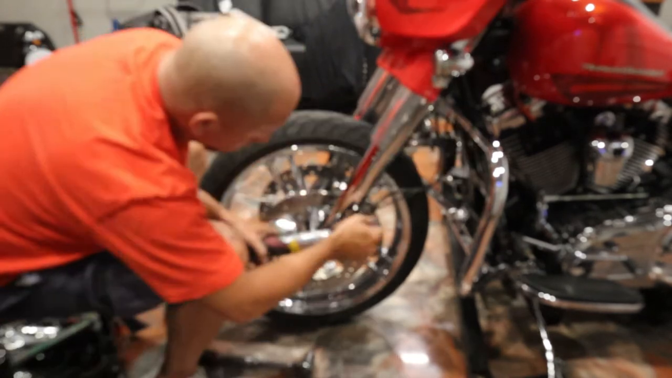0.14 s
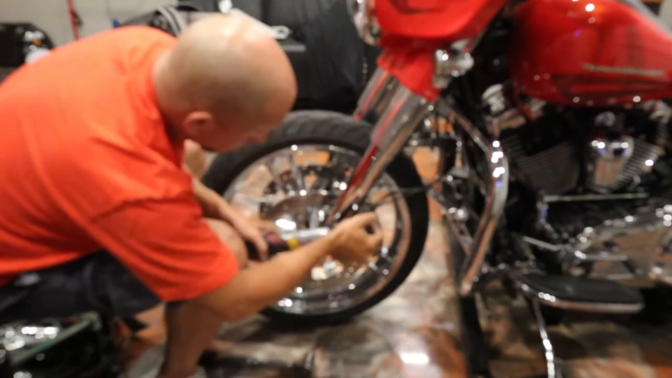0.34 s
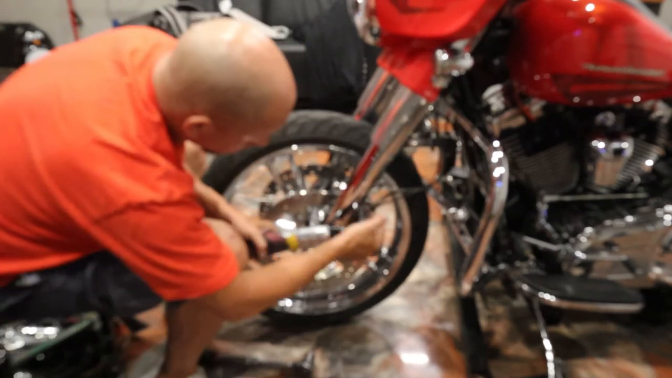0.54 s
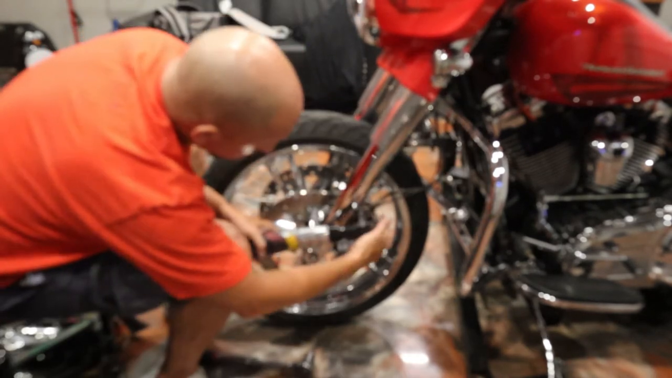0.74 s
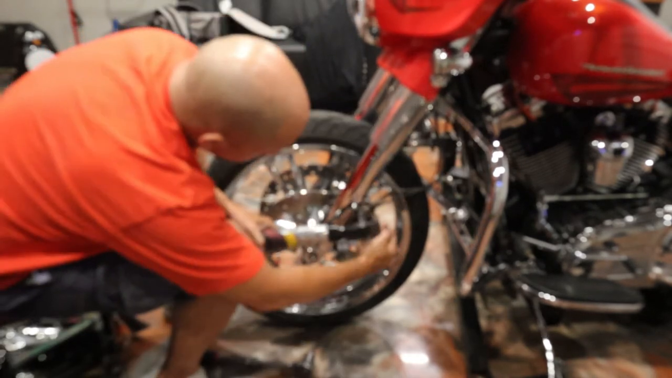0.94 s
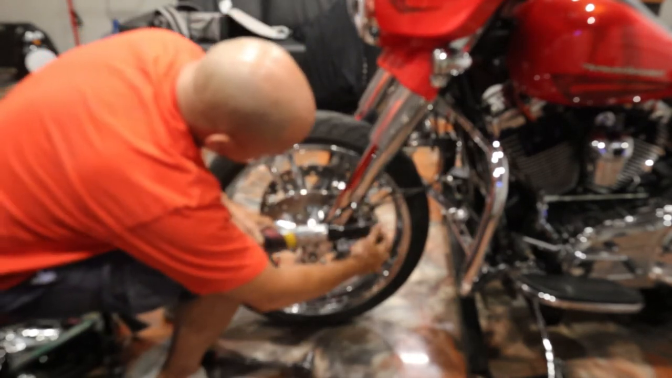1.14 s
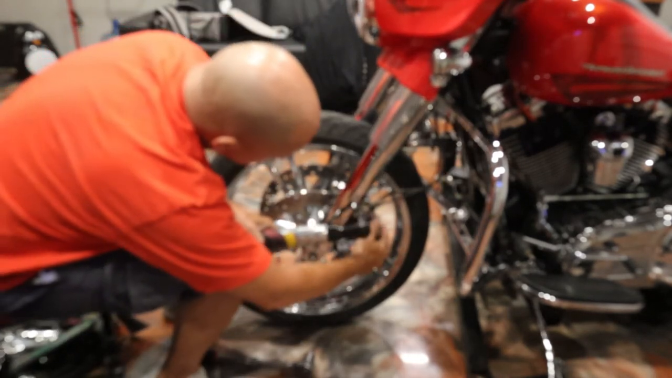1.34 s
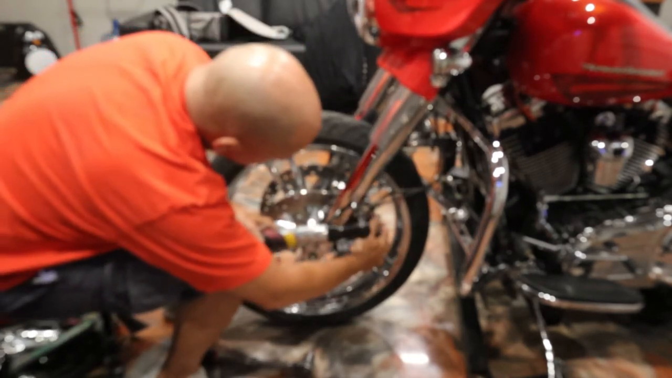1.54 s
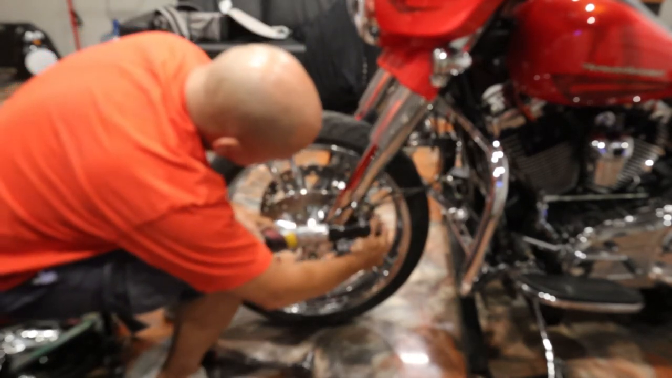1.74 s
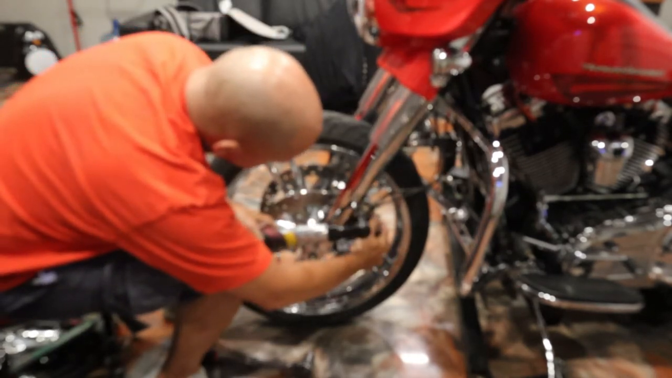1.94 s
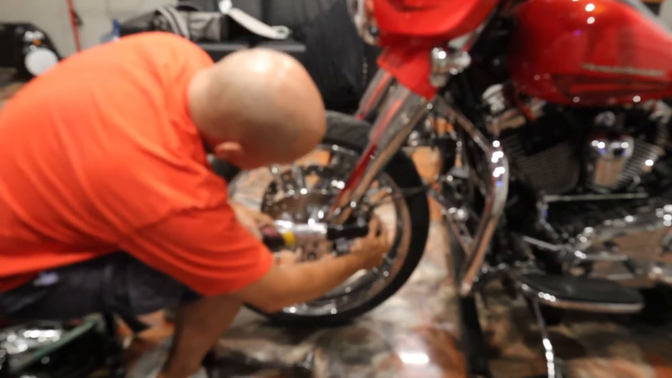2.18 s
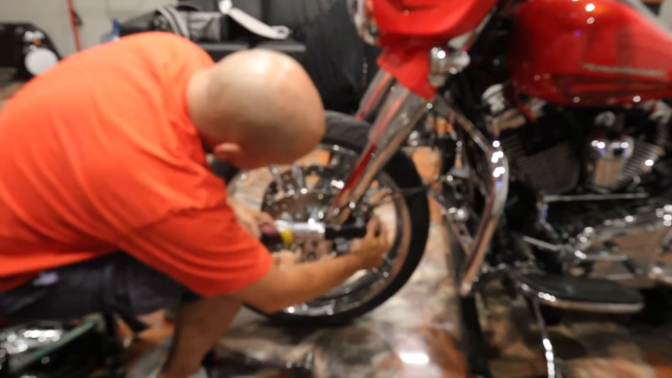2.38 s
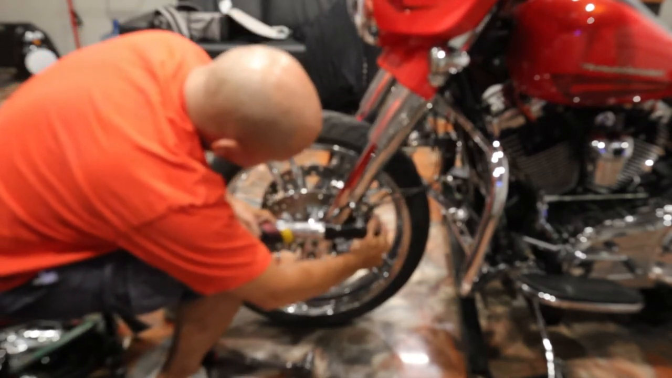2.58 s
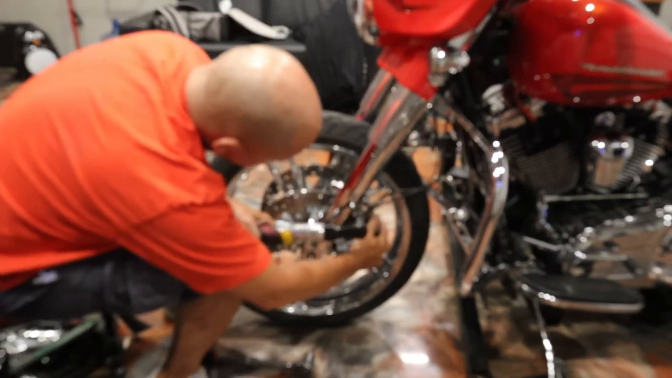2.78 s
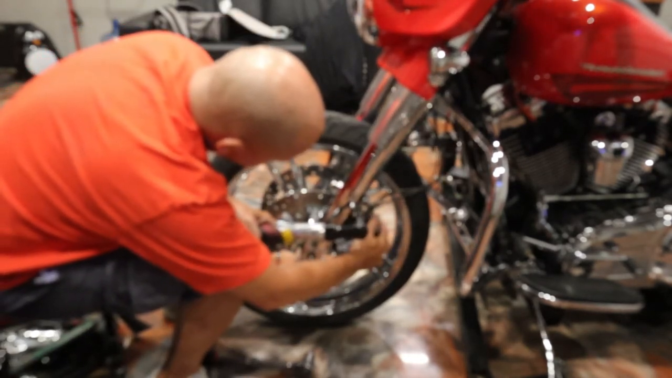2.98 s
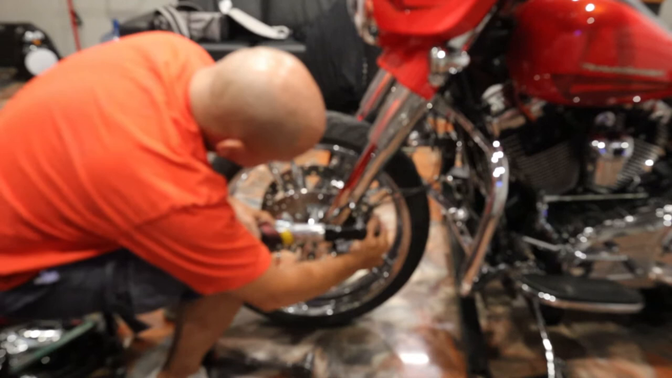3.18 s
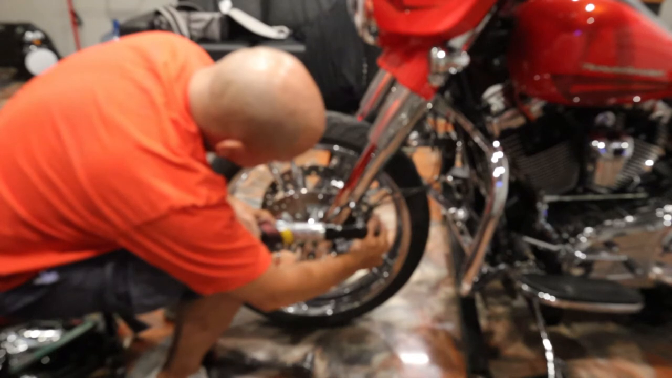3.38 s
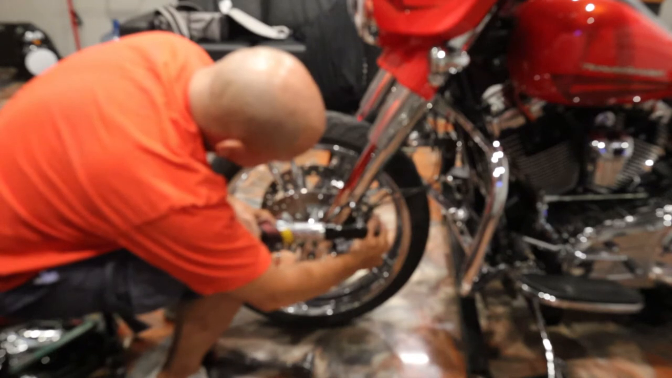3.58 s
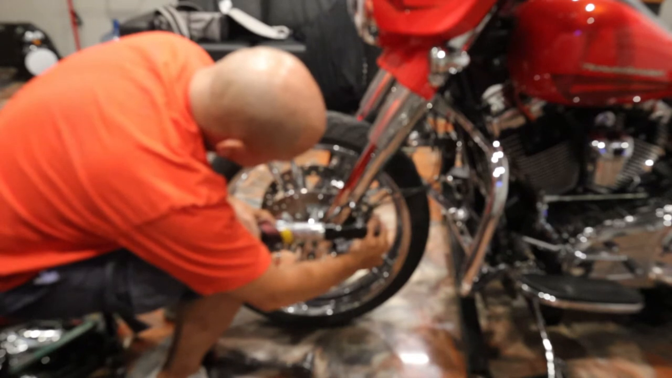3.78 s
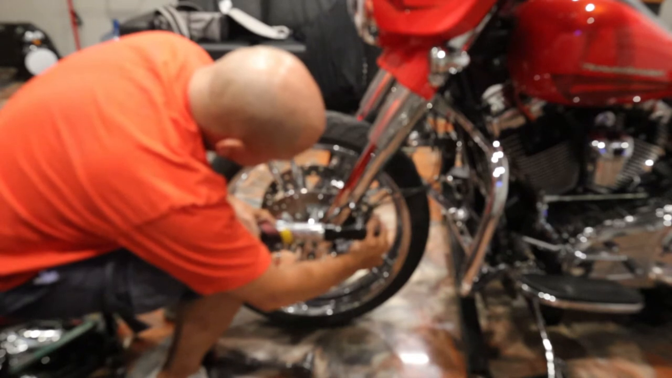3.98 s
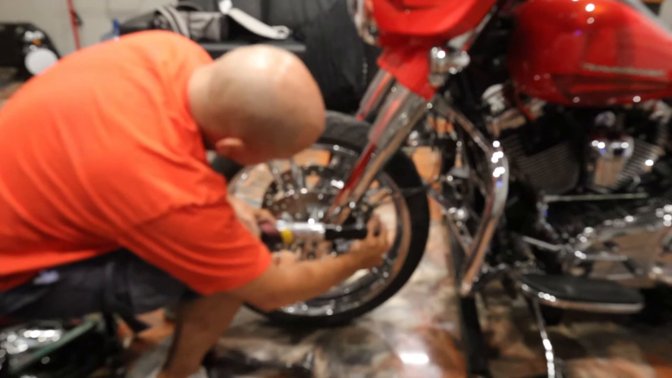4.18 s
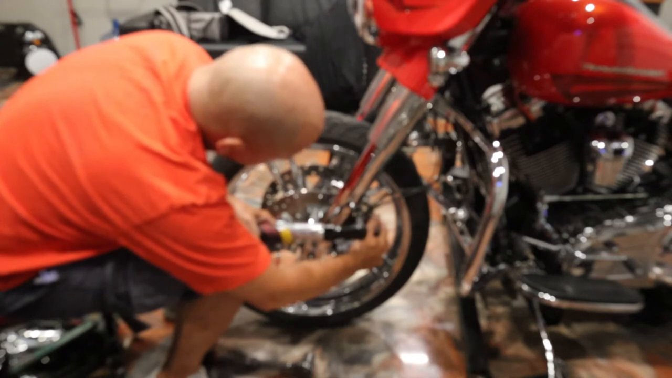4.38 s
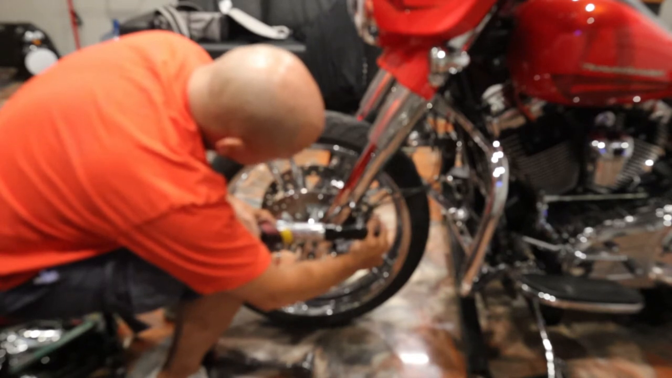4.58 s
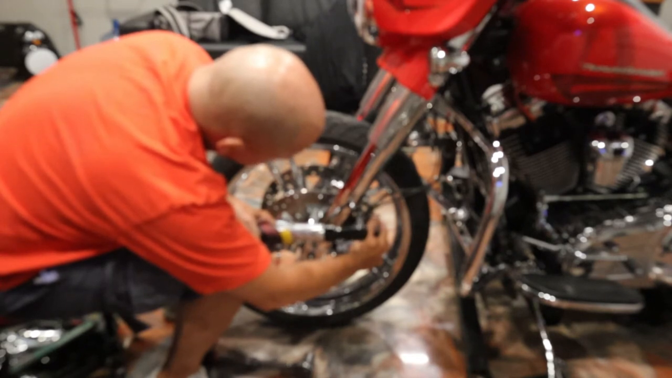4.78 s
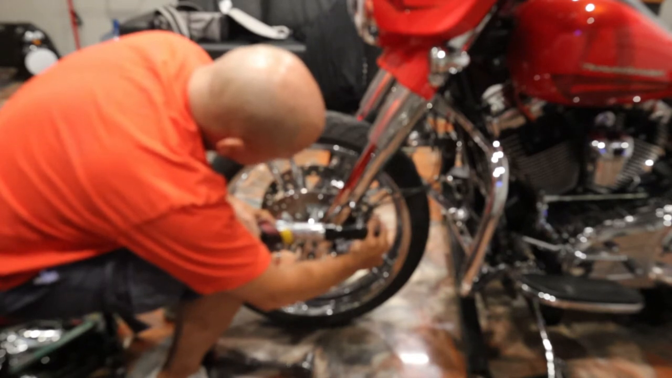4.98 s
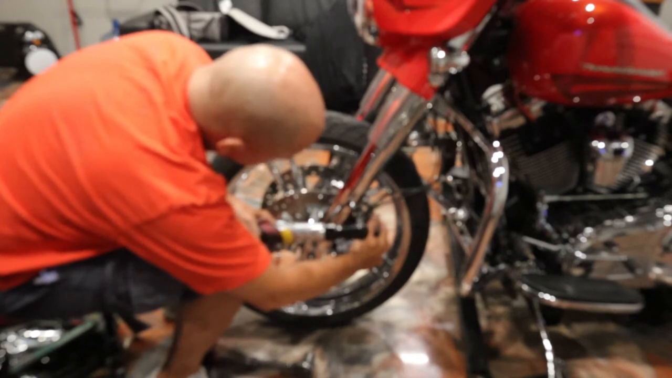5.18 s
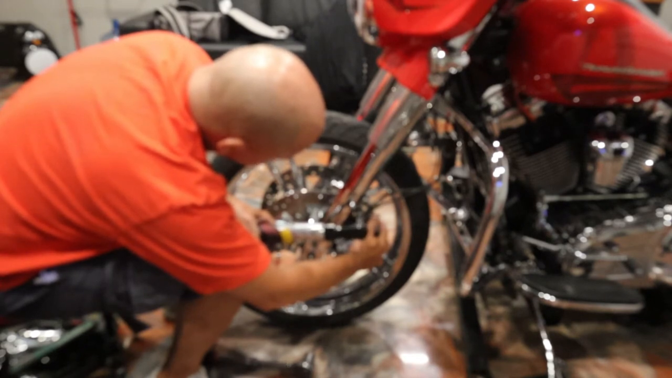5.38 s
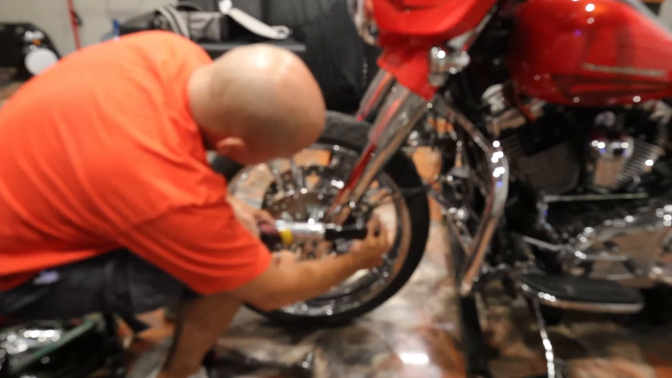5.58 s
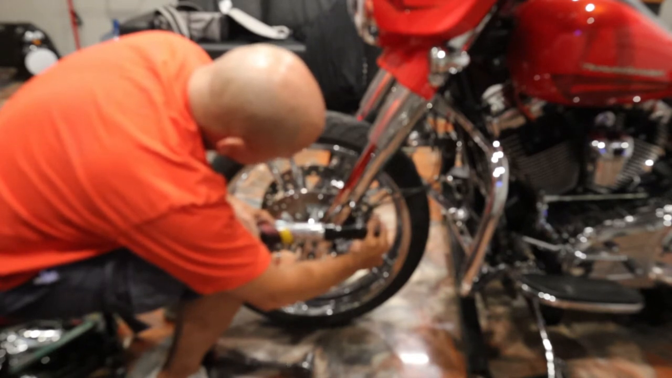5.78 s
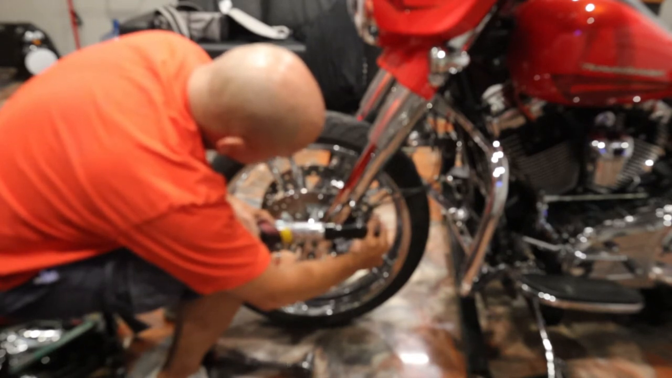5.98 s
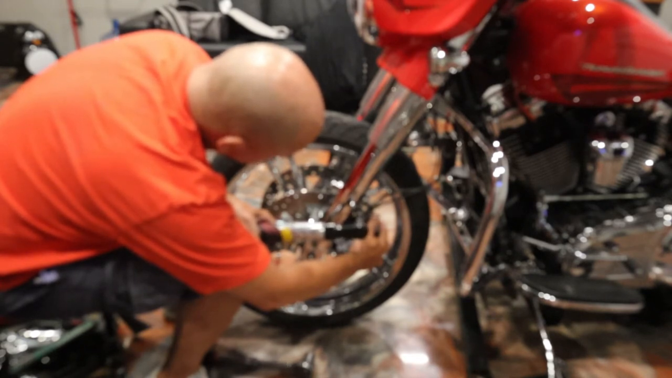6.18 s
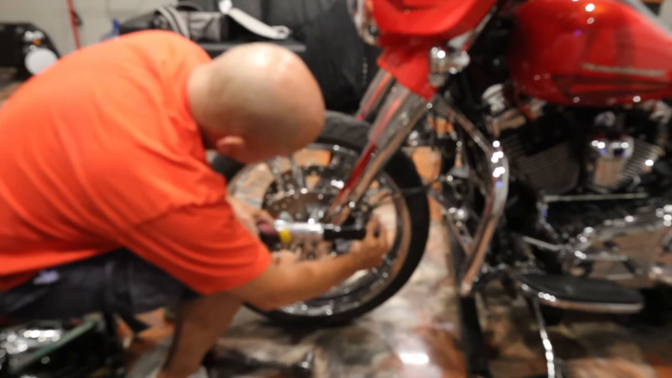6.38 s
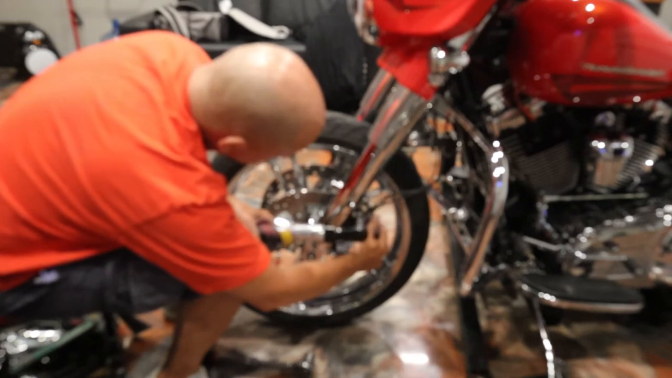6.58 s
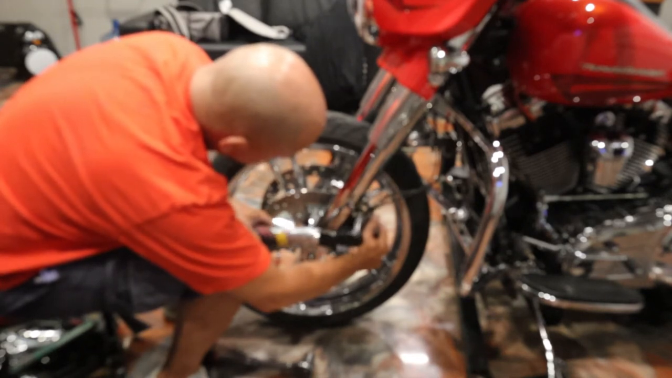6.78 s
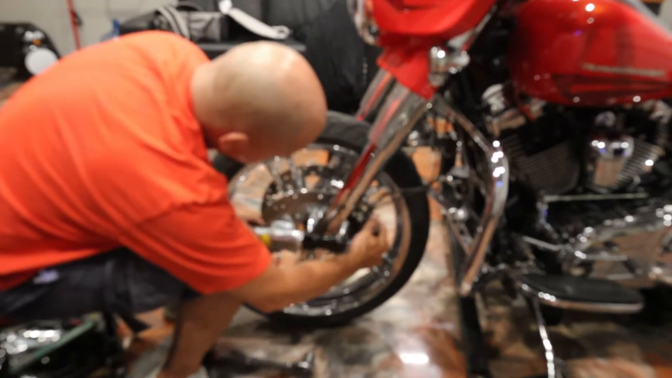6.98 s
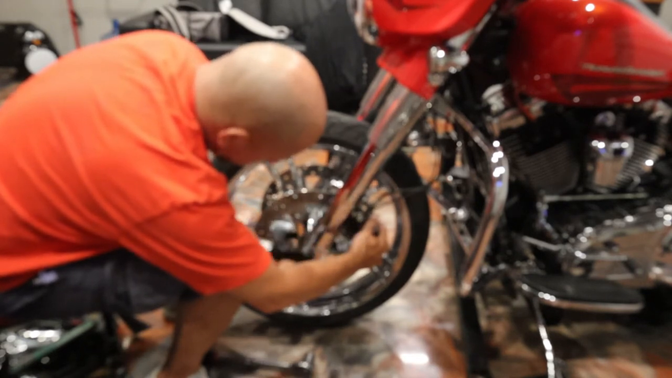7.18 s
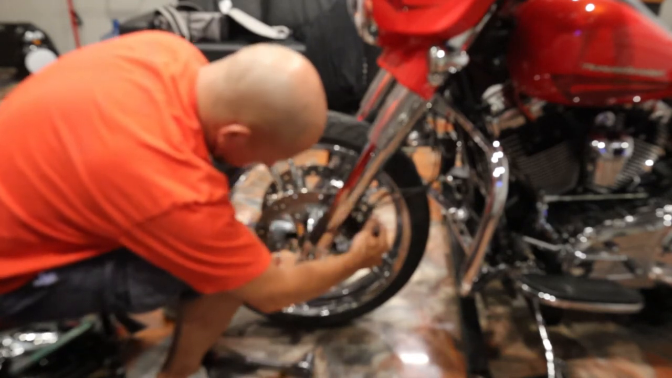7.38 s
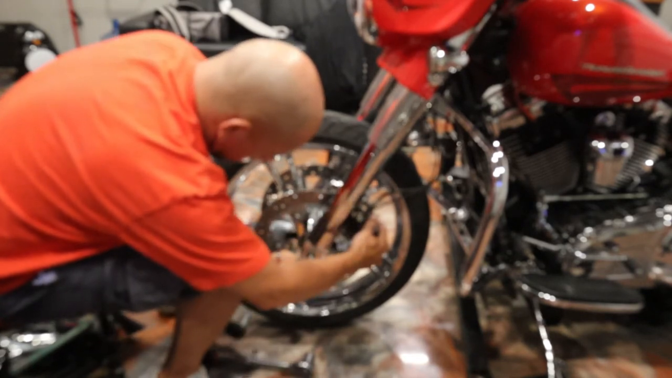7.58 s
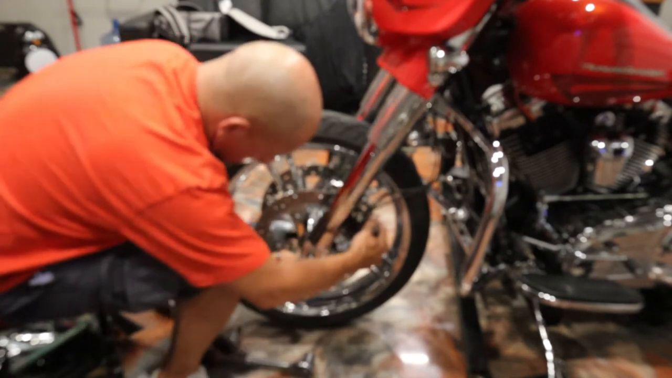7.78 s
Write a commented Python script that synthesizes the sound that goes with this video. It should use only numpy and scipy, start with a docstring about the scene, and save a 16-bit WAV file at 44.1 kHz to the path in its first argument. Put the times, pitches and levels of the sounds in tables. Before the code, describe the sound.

Mono, fairly close, in a garage with short, dull, diffuse reflections. Quiet room hiss and a fading faint ring open the scene, with a soft bump at 0.2 s. At about 0.3 s a cordless impact wrench spins up, clicking and grinding, and by 0.5 s hammers a motorcycle wheel bolt around forty times a second. The sound is a dense, bright steel rattle over knocks, gear grind and a wobbling motor whine; the tone settles lower as the socket seats, with harder clicks near 0.6 s. Gentle swells follow the turning socket. Around 2.0-2.4 s the motor sags to about half speed, labouring, then surges back. Steady hammering continues to 6.6 s, with a light knock near 6.5. It then slows quickly, breaking into irregular single clicks from 6.9 to 7.2 s. Soft handling bumps and low room noise remain until about 8 s.

```python
"""A cordless power tool backs a bolt out of a motorcycle wheel, about forty strokes a second, swelling as the socket turns.
Each stroke opens with a knock in the head, then bright steel clicks and more clatter follow, as noise bursts in resonances.
Gears grind and a mesh tone whines with motor speed; the motor sags once, then runs down into single clicks.
Place: a garage, in mono; diffuse, duller reflections begin 9 ms after the direct sound.
Filtered noise lies underneath as a low room noise, a faint ring fading at the start and a few soft bumps."""
import sys
import numpy as np
from scipy import signal
from scipy.fft import rfft, irfft
from scipy.io import wavfile

SR = 44100
rng = np.random.default_rng(int(sys.argv[2]) if len(sys.argv) > 2 else 0)


def wrap_up_sound(samples):
    """Save the sound to the file named by the first command line argument, as 16-bit audio."""
    columns = np.atleast_2d(samples).T
    # keep every value between -1 and 1, then stretch to whole-number steps
    tamed = np.clip(columns, -1, 1)
    steps = np.round(tamed * 32767).astype(np.int16)
    wavfile.write(sys.argv[1], SR, steps)


N = 345832

# Background
# room noise spectrum: [f/Hz, relative density/dB]
ROOM_SPECTRUM = [(18, -23), (30, -10), (131, -7.5), (189, -7), (210, -7), (259, -8.5), (295, -8),
                 (988, -10), (1220, -12), (3870, -15), (11100, -16.5), (12000, -16), (16000, -20.5)]
ROOM_NOISE_DB = -45.5  # rms
# faint ring dying away in the room: [f/Hz, width/Hz, starting level/dB]
FADING_RING = [(288, 62, -48), (810, 59, -46.5), (1700, 180, -46.5)]
# soft handling bumps and one light knock: [t/s, starting level/dB, f/Hz, width/Hz, t60/s]
SOFT_BUMPS = [(.17, -47, 60, 60, 0.63), (.5, -42, 130, 80, .35), (1.485, -33, 116, 70, 0.16),
              (6.479, -22, 1015, 70, 0.12), (7.275, -42, 128, 150, 0.39), (7.33, -46, 170, 200, 0.17),
              (7.62, -48, 110, 70, .5), (7.706, -32, 52, 40, 0.19)]
GARAGE_T60_S, GARAGE_DB = 0.48, -8  # reflections relative to the tool's direct sound

# Motor and bolt
# motor speed through spin-up, sag and run-down: [t/s, speed/(strokes per s)]
MOTOR_SPEED = [(0.36, 27.76), (0.46, 39.46), (0.75, 41.25), (1.12, 40.22), (1.25, 41.07), (2.02, 40.13),
               (2.2, 27.78), (2.35, 21.63), (2.46, 39.18), (3.07, 40.55), (4.36, 40.06), (5.93, 39.77),
               (6.61, 39.94), (6.87, 23.3), (6.93, 18.3), (7.2, 5)]
# load on knock, gears and whine, and less so on the steel: [t/s, level/dB]
TOOL_LOAD = [(.35, 1.5), (.45, 4.5), (.68, -4.5), (1.15, -2), (1.5, 0.3), (1.62, -2), (2.05, 1.6),
             (2.33, -1), (2.43, 3.0), (3.0, -0.1), (3.55, -0.5), (5.3, 1.03), (5.62, -0.85), (6.25, 0.65),
             (6.8, 0.5)]
FULL_SPEED = 40  # strokes per s
FIRST_STROKE_S, LAST_STROKE_S = 0.364, 6.955
SEATING_S, SEATING_LAG_S = 0.57, 0.21  # socket settles onto the bolt: start and time constant
BREAKS_FREE_S, TIGHT_BOLT_DB = 0.645, 1  # the steel rings harder until the bolt breaks free
LET_GO_S = 6.61  # trigger released: the motor no longer labours

# Gears
# gear housing spectrum: [f/Hz, relative density/dB]
HOUSING_SPECTRUM = [(60, -35), (200, -20.5), (290, -14), (370, -6), (480, -11.5), (650, -3), (1200, -3),
                    (1700, -1.5), (2050, 1), (3000, -3), (5000, -0.5), (12000, -11)]
# gear housing resonances: [f/Hz, width/Hz, lift/dB]
HOUSING_RESONANCES = [(401, 22, 3.5), (573.5, 35, 7), (610, 16, 1), (1777, 280, 7.5), (2054, 62, -12),
                      (2390, 150, -1)]
TRIGGER_S, GEAR_ATTACK_S, STOP_S, GEAR_RELEASE_S = 0.313, 0.03, 7.23, 0.042
GEAR_DB, GEAR_SPEED_POWER = -29, 1.2
COASTING_SPEED = 18.3  # strokes per s, below which gears and whine fade
WHINE_DB, WHINE_LOAD_SHARE, WHINE_SPEED_POWER = -14, 1.7, 2.8  # on top of the gear level
WHINE_WOBBLE, WHINE_FLUTTER_DB = 0.06, 4.5  # spread of the pitch (as a share) and of the level
LABOUR_DB, LABOUR_SAG = 6.5, 3.6  # whine lift, complete at this sag below full speed (strokes per s)

# Strokes
# contacts within a stroke, relative levels: [share of stroke, steel level/dB, knock level/dB, decay/s]
STROKE_CONTACTS = [(0.0, -14, -2, .002), (.1, -16, -3.5, 0.0011), (.275, 1.5, -2.5, 0.0013),
                   (.375, -3, 1, 0.0024), (.49, -3, -1, 0.00079), (.58, -2.5, 1, 0.00092)]
# single clicks and hardest strikes: [t/s, relative steel level/dB, knock level relative to steel/dB]
SINGLE_CLICKS = [(0.3448, -14.5, 4), (0.398, -3, -0.5), (0.4528, 1, -10), (0.61, 4, -16), (0.636, 6, -24),
                 (0.6624, 2, -24), (0.8094, 0, -26), (1.1514, -1, -15), (2.598, 7, -18), (2.855, 5, -23),
                 (2.8792, 6, -27), (4.9683, 0, -6), (5.494, 3, -15), (6.879, -1, -22),
                 (6.9735, -13.5, -5.5), (6.986, -9, -6), (6.9993, -3.5, -4), (7.0464, -8.5, -15),
                 (7.064, -11, -3.5), (7.11, -7.5, -0.5), (7.1644, -16.5, -12), (7.202, 3.5, -15.5)]
# small steel parts spectrum: [f/Hz, relative density/dB]
STEEL_SPECTRUM = [(3000, -53), (6000, -15), (7400, -10), (8600, 0), (9800, 1.5), (11000, -13), (12500, -30),
                  (14000, -17), (16000, -46.5)]
# small steel parts resonances: [f/Hz, width/Hz, lift/dB]
STEEL_RESONANCES = [(8425, 340, 8.5), (9354, 153, 8.7), (10050, 58, 5.4), (13100, 240, 17.4)]
# head and socket spectrum: [f/Hz, relative density/dB]
HEAD_SPECTRUM = [(200, -40.5), (600, -16), (1500, -8), (2500, -6.5), (3000, -20), (3500, -3), (4400, -9),
                 (5700, -5.5), (6600, -7), (8000, 1.5), (15000, -21)]
# head and socket resonances: [f/Hz, width/Hz, lift/dB]
HEAD_RESONANCES = [(4010, 490, 8.6), (4815, 450, 10.4), (5930, 39, 3.9)]
# long ring of socket and wheel, per unit click: [f/Hz, level/dB, t60/s]
LONG_RING = [(1798, -63, .5), (7973, -58, .2), (8419, -49.5, .5), (9071, -60, .25), (9954, -58, .2)]
# swells of the steel ring as the socket turns: [swells per turn, depth/dB, share of turn at first crest]
STEEL_TURN_SWELLS = [(1, 1.37, 0.43), (4, 0.94, 0.066)]
# swells of the head knock as the socket turns: [swells per turn, depth/dB, share of turn at first crest]
KNOCK_TURN_SWELLS = [(1, 0.78, 0.1), (2, 0.82, 0.23)]
STROKES_PER_TURN = 21
STROKE_COUNT = 280  # more than enough; those after LAST_STROKE_S stay silent
# level at full speed, share of the load's dB swing, exponent of the motor speed
STEEL_DB, STEEL_LOAD_SHARE, STEEL_SPEED_POWER = -19.5, 0.5, 0.1
KNOCK_DB, KNOCK_LOAD_SHARE, KNOCK_SPEED_POWER = -22, 0.83, 0.56
STEEL_RISE_S, KNOCK_RISE_S = 0.0007, 0.00081  # time the parts take to press home

RECORDING_CUTOFF_HZ = 15900


def from_db(db):
    """Decibels to amplitude gain."""
    return 10 ** (np.asarray(db) / 20)


def rms_one(x):
    """Scale to rms 1."""
    return x / np.sqrt(np.mean(x ** 2) + 1e-20)


def seconds():
    """Time of every sample."""
    return np.arange(N) / SR


def curve(rows):
    """Interpolate a [time, value] table at every sample."""
    times, values = np.transpose(rows)
    return np.interp(seconds(), times, values)


def drift(rate):
    """Random wander through normal knots of spread 1, at the given knots per second."""
    knots = rng.standard_normal(4000)
    return np.interp(seconds() * rate, np.arange(len(knots)), knots)


def impulses(times, sizes):
    """Clicks of given sizes at given times."""
    samples = np.clip(times * SR, 0, N - 1).astype(int)
    return np.bincount(samples, sizes, N)


def die_away(x, decay_s):
    """Each click starts an exponential decay."""
    return signal.lfilter([1], [1, -np.exp(-1 / (decay_s * SR))], x + 1e-18)


def ring(x, hz, t60):
    """Two-pole resonator: a unit click sets a decaying sine of starting height 1 ringing."""
    radius = from_db(-60 / (t60 * SR))
    angle = 2 * np.pi * hz / SR
    return signal.lfilter([0, np.sin(angle)], [1, -2 * radius * np.cos(angle), radius ** 2], x + 1e-18)


def noise_around(hz, width):
    """Noise through one resonance; rms 1."""
    t60 = np.log(1000) / (np.pi * width)
    return rms_one(np.gradient(ring(rng.standard_normal(N), hz, t60)))


def colour(x, spectrum, resonances=(), stretch=1):
    """Minimum-phase body filter of unit power gain; stretch multiplies all its frequencies."""
    size = 8192
    bins = np.arange(size // 2 + 1)
    hz = np.maximum(bins * SR / size, 1) / stretch
    points = np.array(spectrum)
    db = np.interp(np.log(hz), np.log(points[:, 0]), points[:, 1])
    for centre, width, lift in resonances:
        db = db + lift / (1 + (2 * (hz - centre) / width) ** 2)
    # folding the cepstrum onto positive times gives the minimum phase
    cepstrum = irfft(np.log(from_db(db)))
    folded = np.r_[0, 2 * cepstrum[1:size // 2]]
    response = irfft(np.exp(rfft(folded, size)))
    return signal.fftconvolve(x, response / np.linalg.norm(response))[:N]


def room_noise(fade_t60=0.65):
    """Steady hiss and rumble, with a faint resonant ring that fades from the start."""
    steady = from_db(ROOM_NOISE_DB) * colour(rng.standard_normal(N), ROOM_SPECTRUM)
    fading = sum(from_db(db) * noise_around(hz, width) for hz, width, db in FADING_RING)
    return steady + fading * from_db(-60 * seconds() / fade_t60)


def bumps(rise_s=0.0078):
    """Dull thuds: resonant noise, low-passed, swelling quickly and dying away."""
    out = 0
    for start, db, hz, width, t60 in SOFT_BUMPS:
        age = np.maximum(seconds() - start, 0)
        low_pass = signal.butter(2, 2 * hz, fs=SR, output="sos")
        thud = signal.sosfilt(low_pass, noise_around(hz, width))
        out = out + thud * np.minimum(age / rise_s, 1) * from_db(db - 60 * age / t60)
    return out


def garage(x, wall_hz=5000, gap_s=0.009, sway_per_s=0.913):
    """Diffuse, duller reflections off floor and walls; their pattern shifts as the worker sways."""
    t = np.arange(SR) / SR
    tails = rng.standard_normal((4, len(t))) * from_db(-60 * t / GARAGE_T60_S) * (t > gap_s)
    tails = tails / np.linalg.norm(tails[0])
    tails = signal.sosfilt(signal.butter(1, wall_hz, fs=SR, output="sos"), tails)
    # slowly wandering mix of the tails, at constant total power
    shares = np.array([drift(sway_per_s) for _ in tails])
    shares = shares / np.linalg.norm(shares, axis=0)
    reflections = sum(share * signal.fftconvolve(x, tail)[:N] for share, tail in zip(shares, tails))
    return from_db(GARAGE_DB) * reflections


def seated():
    """How firmly the socket sits on the bolt, settling exponentially from 0 towards 1."""
    return 1 - np.exp(-np.maximum(seconds() - SEATING_S, 0) / SEATING_LAG_S)


def seated_colour(x, spectrum, resonances, loose_stretch):
    """The tool's resonances lie higher until the socket sits firmly on the bolt and loads them."""
    firm = seated()
    settled = colour(x * np.sqrt(firm), spectrum, resonances)
    loose = colour(x * np.sqrt(1 - firm), spectrum, resonances, loose_stretch)
    return settled + loose


def chatter(per_s, hiss):
    """Dense tiny rebounds of metal on metal, with some sliding hiss; rms 1."""
    rebounds = (rng.random(N) < per_s / SR) * rng.choice([-1, 1], N)
    return rms_one(rms_one(rebounds) + hiss * rng.standard_normal(N))


def single_clicks(decay_s=0.0026, click_db=-7.5, rise_s=0.00027):
    """Contact pressure, on steel and on head, of the strikes that stand out alone."""
    times, steel_db, knock_db = np.transpose(SINGLE_CLICKS)
    pressures = []
    for db in (steel_db, steel_db + knock_db):
        strikes = impulses(times, from_db(db + click_db))
        rising = die_away(strikes, rise_s) / (rise_s * SR)
        pressures.append(die_away(rising, decay_s))
    return pressures


def mesh_whine(speed, load_db, pace, mesh_per_stroke=44.0):
    """The gear-mesh tone follows the motor, shaken by the blows, and swells while the motor labours."""
    mesh_hz = mesh_per_stroke * speed * (1 + WHINE_WOBBLE * drift(170))
    sag = np.clip((FULL_SPEED - speed) / LABOUR_SAG, 0, 1)
    labour = sag * seated() * (seconds() < LET_GO_S)
    level_db = WHINE_DB + WHINE_LOAD_SHARE * load_db + LABOUR_DB * labour
    level_db = level_db + WHINE_FLUTTER_DB * drift(130)
    tone = np.sin(2 * np.pi * np.cumsum(mesh_hz) / SR)
    return tone * from_db(level_db) * pace ** WHINE_SPEED_POWER


def gears(speed, knock, load_db, load_share=0.47, grind_db=1.0, jolt_db=-2.0):
    """Gear teeth grind and whine harder under each stroke; single strikes jolt the housing."""
    starting = np.clip((seconds() - TRIGGER_S) / GEAR_ATTACK_S, 0, 1) ** 2
    stopping = np.clip((STOP_S - seconds()) / GEAR_RELEASE_S, 0, 1)
    pace = np.minimum(speed / COASTING_SPEED, 1)
    level = from_db(GEAR_DB + load_db) * starting * stopping * pace ** GEAR_SPEED_POWER
    tooth_load = level * np.sqrt(1 - load_share + load_share * knock ** 2)
    jolts = from_db(jolt_db) * single_clicks()[1]
    shaking = np.hypot(from_db(grind_db) * tooth_load, jolts)
    rattle = shaking * chatter(per_s=3000, hiss=0.54)
    grind = seated_colour(rattle, HOUSING_SPECTRUM, HOUSING_RESONANCES, loose_stretch=1.14)
    return grind + tooth_load * mesh_whine(speed, load_db, pace)


def recoil(strokes, force, push_db=-24.0, low_hz=430, high_hz=720, share=0.3008):
    """Every stroke gives the housing one soft, even push, which hums at multiples of the stroke rate."""
    times = np.interp(np.arange(STROKE_COUNT) + share, strokes, seconds())
    pushes = impulses(times, times < LAST_STROKE_S)
    band = signal.butter(2, [low_hz, high_hz], "band", fs=SR, output="sos")
    hum = colour(signal.sosfilt(band, pushes + 1e-18), HOUSING_SPECTRUM, HOUSING_RESONANCES)
    return from_db(push_db) * force * rms_one(hum)


def swell_db(strokes, swells):
    """Rise and fall of the stroke strength as the socket goes round."""
    turns = strokes / STROKES_PER_TURN
    return sum(db * np.cos(2 * np.pi * per_turn * (turns - crest)) for per_turn, db, crest in swells)


def stroke_force(speed, strokes, load_db):
    """Strength of steel ring and head knock, from load, motor speed and the angle of the socket."""
    tight_db = TIGHT_BOLT_DB * (seconds() < BREAKS_FREE_S)
    steel_db = STEEL_DB + STEEL_LOAD_SHARE * load_db + swell_db(strokes, STEEL_TURN_SWELLS) + tight_db
    knock_db = KNOCK_DB + KNOCK_LOAD_SHARE * load_db + swell_db(strokes, KNOCK_TURN_SWELLS)
    pace = speed / FULL_SPEED
    return from_db(steel_db) * pace ** STEEL_SPEED_POWER, from_db(knock_db) * pace ** KNOCK_SPEED_POWER


def stroke_pressure(strokes, speed, slow_loss_db=4.5, slip=0.017, scatter=0.027,
                    stroke_db=0.68, contact_db=1.5):
    """Contact pressure on steel parts and head: the same contacts each stroke, never quite alike."""
    # slip and scatter are shares of a stroke; stroke_db and contact_db are random spreads
    stroke = np.arange(STROKE_COUNT) + slip * rng.standard_normal(STROKE_COUNT)
    strength_db = stroke_db * rng.standard_normal(STROKE_COUNT)
    steel, knock = 0, 0
    for share, steel_db, knock_db, decay_s in STROKE_CONTACTS:
        late, hard, dull = rng.standard_normal((3, STROKE_COUNT))
        times = np.interp(stroke + share + scatter * late, strokes, seconds())
        playing = times < LAST_STROKE_S
        # a slow hammer has little left for the late contacts of its stroke
        slowness = FULL_SPEED / np.interp(times, seconds(), speed) - 1
        common_db = strength_db - slow_loss_db * share * slowness
        steel_size = playing * from_db(steel_db + common_db + contact_db * hard)
        knock_size = playing * from_db(knock_db + common_db + contact_db * (hard + dull) / 2)
        # overlapping contacts add in energy, which decays twice as fast as pressure
        steel = steel + die_away(impulses(times, steel_size ** 2), decay_s / 2)
        knock = knock + die_away(impulses(times, knock_size ** 2), decay_s / 2)
    steel_pressure = np.sqrt(die_away(steel, STEEL_RISE_S))
    knock_pressure = np.sqrt(die_away(knock, KNOCK_RISE_S))
    return rms_one(steel_pressure), rms_one(knock_pressure)


def head(steel, knock):
    """The contacts ring the small steel parts, knock in the head and keep socket and wheel singing."""
    lone_steel, lone_knock = single_clicks()
    bright = np.hypot(steel, lone_steel) * chatter(per_s=8000, hiss=0.57)
    dull = np.hypot(knock, lone_knock) * chatter(per_s=7000, hiss=0.66)
    clicking = colour(bright, STEEL_SPECTRUM, STEEL_RESONANCES)
    clatter = seated_colour(dull, HEAD_SPECTRUM, HEAD_RESONANCES, loose_stretch=1.12)
    singing = sum(from_db(db) * ring(bright, hz, t60) for hz, db, t60 in LONG_RING)
    return clicking + clatter + singing


def scene():
    """Motor speed and load drive strokes and gears; the garage answers."""
    speed, load_db = curve(MOTOR_SPEED), curve(TOOL_LOAD)
    strokes = np.cumsum(speed) / SR
    strokes = strokes - np.interp(FIRST_STROKE_S, seconds(), strokes)  # stroke 0 falls here
    steel, knock = stroke_pressure(strokes, speed)
    steel_force, knock_force = stroke_force(speed, strokes, load_db)
    tool = gears(speed, knock, load_db) + recoil(strokes, knock_force)
    tool = tool + head(steel * steel_force, knock * knock_force)
    return (room_noise() + bumps() + garage(tool) + tool)[None]


def record(dry, top=0.76):
    """One microphone channel: the loudest peaks are rounded, then a steep low-pass cuts the top."""
    rounded = top * np.tanh(dry / top)
    low_pass = signal.ellip(10, 0.1, 80, RECORDING_CUTOFF_HZ, fs=SR, output="sos")
    return signal.sosfilt(low_pass, rounded)


dry = scene()
out = record(dry)
wrap_up_sound(out)
```